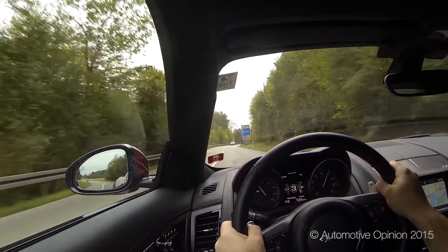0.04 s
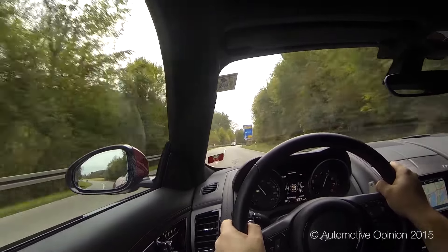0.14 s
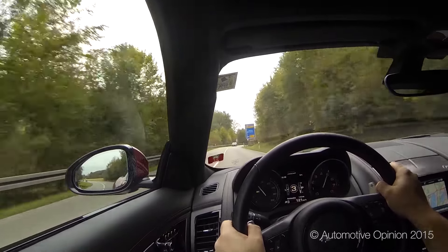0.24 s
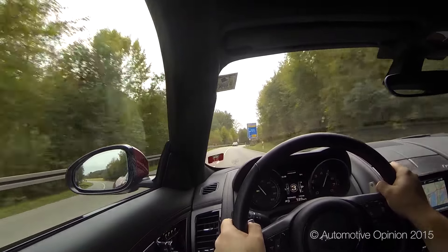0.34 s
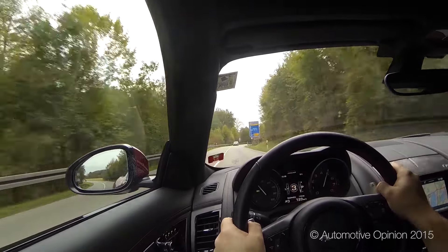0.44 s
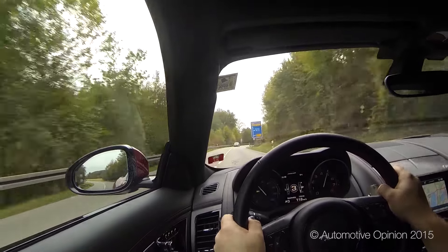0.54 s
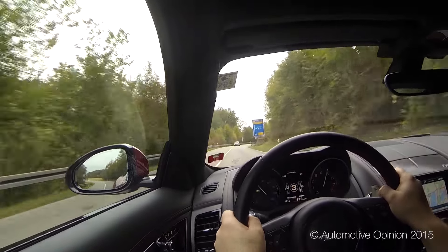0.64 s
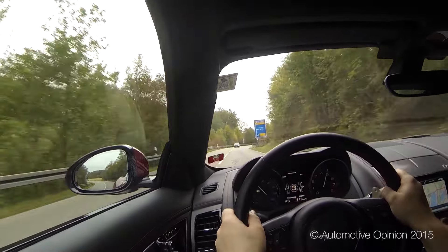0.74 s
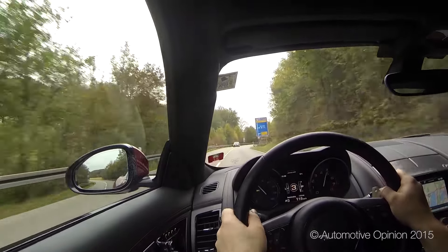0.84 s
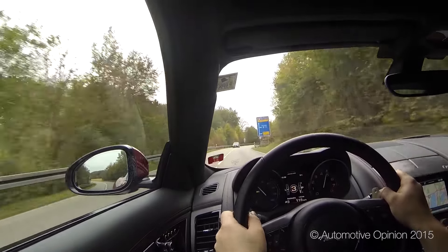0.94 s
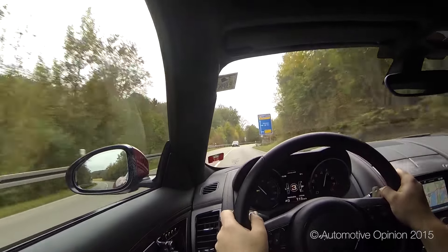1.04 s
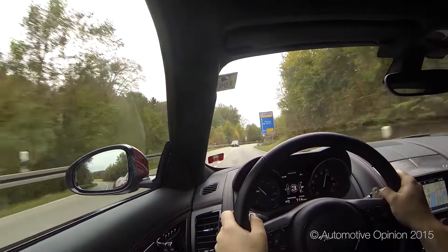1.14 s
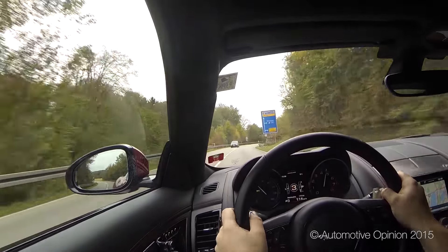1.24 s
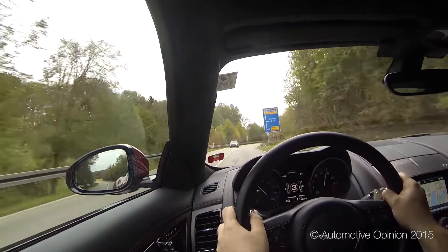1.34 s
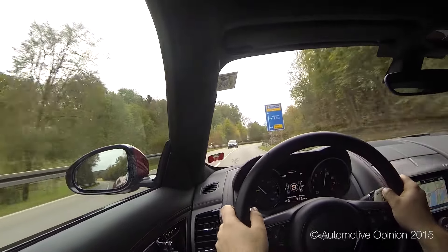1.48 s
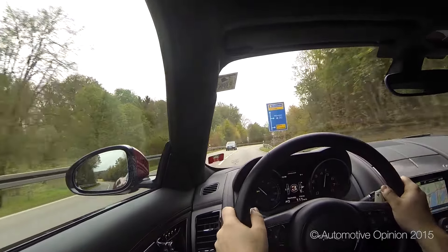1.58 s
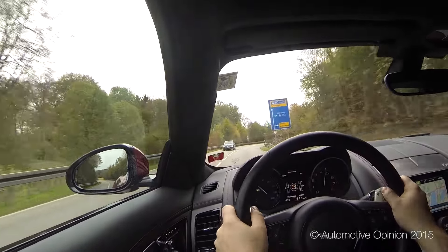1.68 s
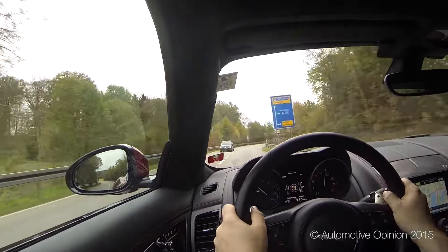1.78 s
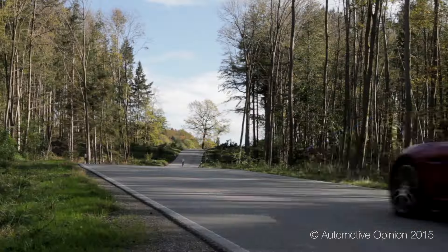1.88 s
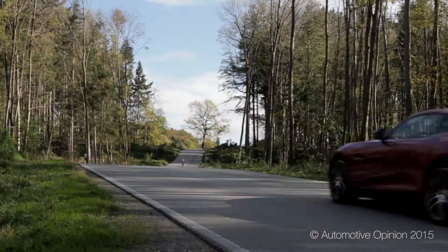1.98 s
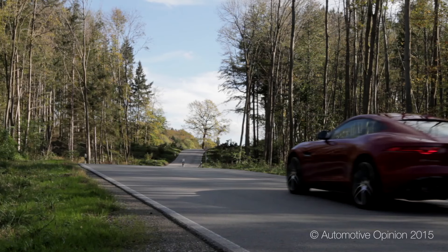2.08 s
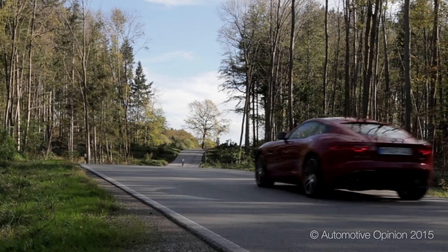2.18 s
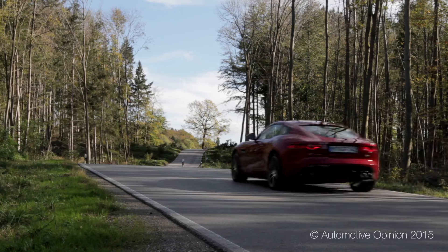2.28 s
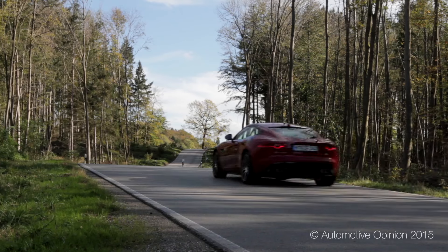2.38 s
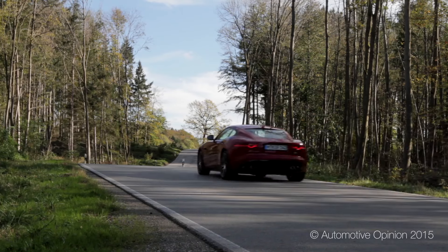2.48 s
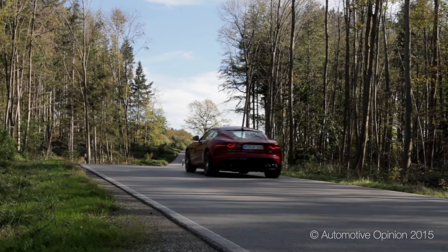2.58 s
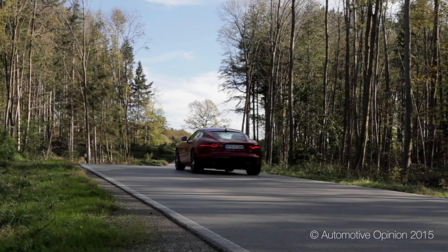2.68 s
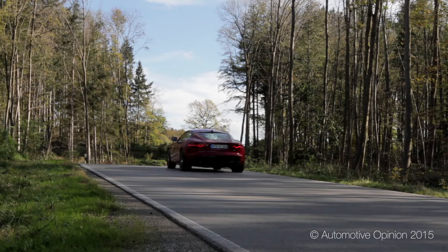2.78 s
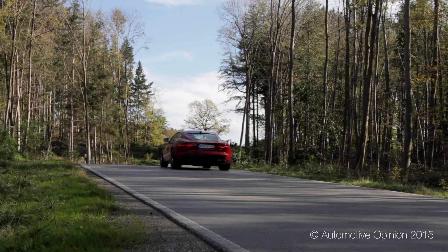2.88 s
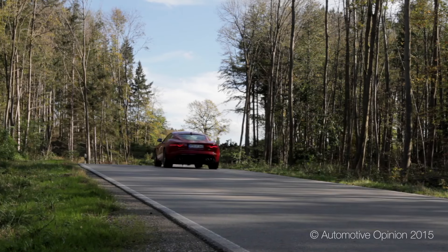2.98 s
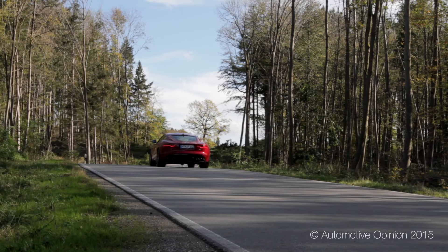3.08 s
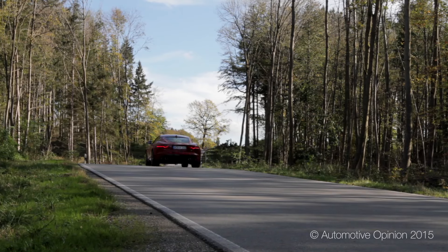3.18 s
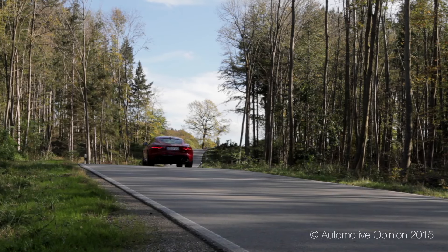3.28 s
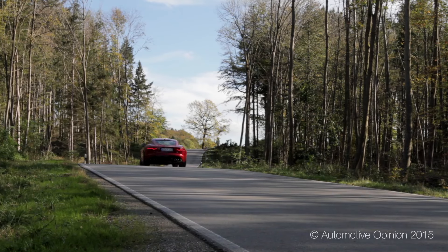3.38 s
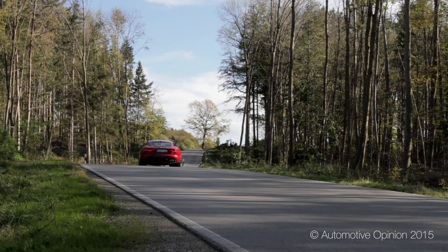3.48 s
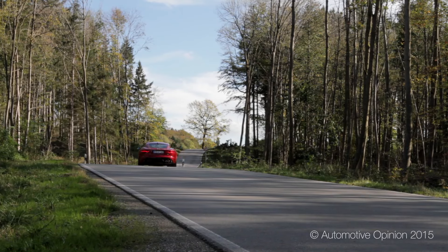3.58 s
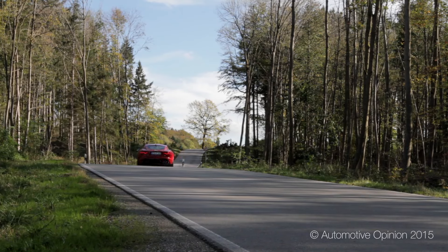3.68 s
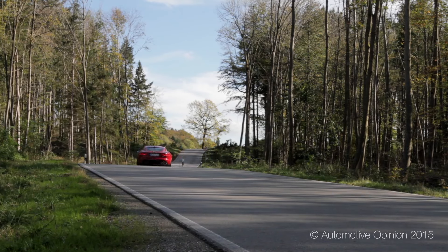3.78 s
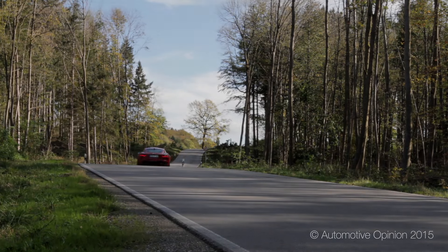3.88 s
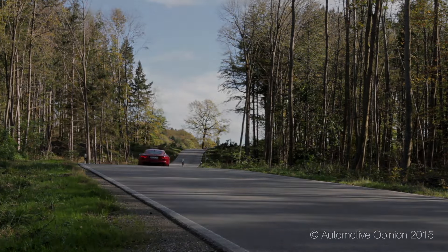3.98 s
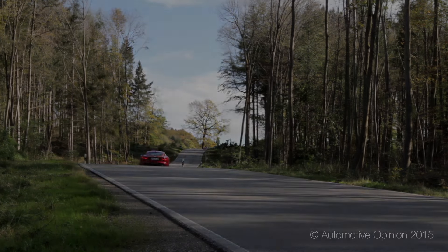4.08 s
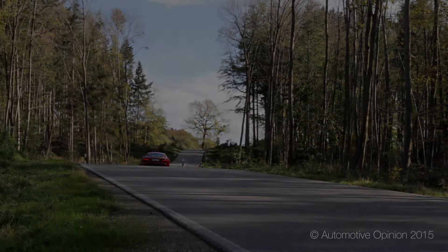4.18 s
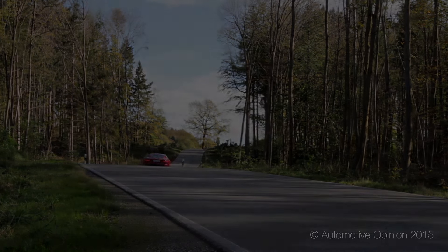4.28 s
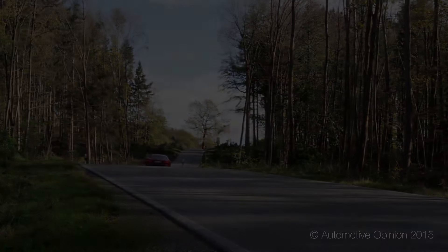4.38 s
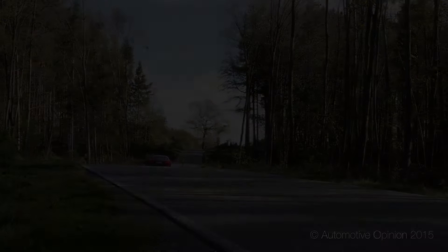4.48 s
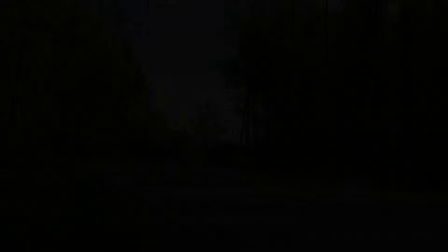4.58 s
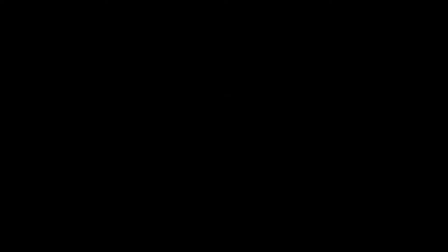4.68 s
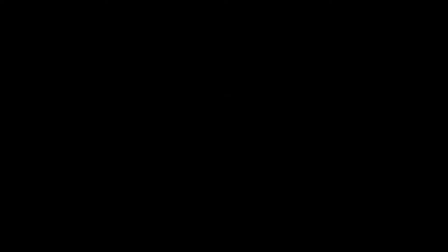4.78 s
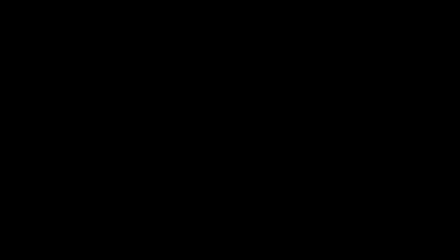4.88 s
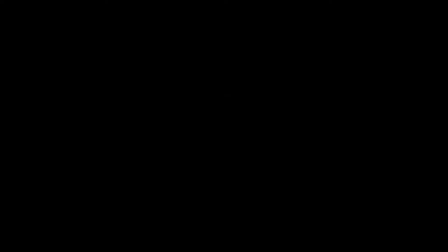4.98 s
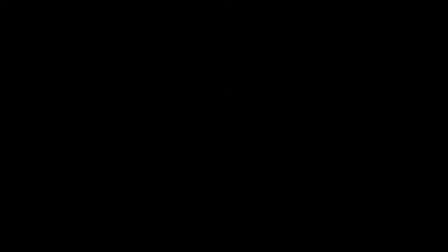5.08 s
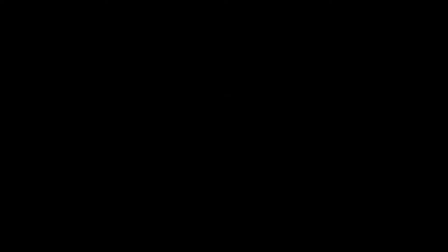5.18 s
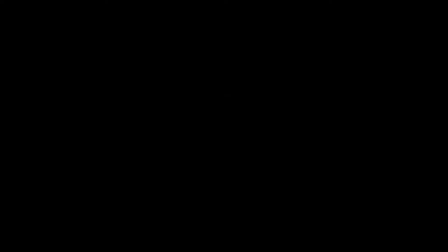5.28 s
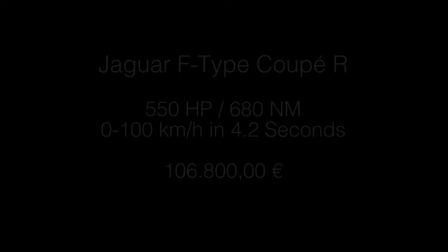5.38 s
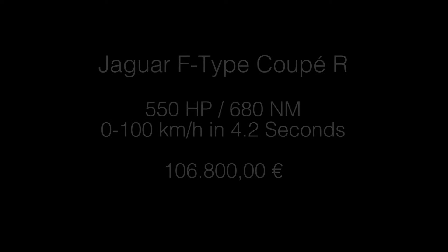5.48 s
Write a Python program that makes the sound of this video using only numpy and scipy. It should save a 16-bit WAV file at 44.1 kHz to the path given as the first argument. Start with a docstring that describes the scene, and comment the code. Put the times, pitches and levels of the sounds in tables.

```python
"""Wind buffets and the road rumbles over a droning cabin: a supercharged V8 sports car is coasting.
Unburnt fuel burbles in the exhaust, muffled at first, then cracks in the open air and rings the pipes.
The engine picks up and pulls with a hard, spitting rasp, each firing a pressure pulse and a jet of gas.
It changes up one gear with a blurt and eases off into the distance until mostly the tyres are left."""
import sys
import numpy as np
from scipy import signal
from scipy.fft import rfft, irfft
from scipy.io import wavfile
from scipy.ndimage import uniform_filter1d

SR = 44100
rng = np.random.default_rng(int(sys.argv[2]) if len(sys.argv) > 2 else 0)


def store_pcm(level_fs):
    """Save levels as 16-bit WAV."""
    pcm = np.round(np.clip(level_fs, -1, 1) * 32767).astype(np.int16)
    wavfile.write(sys.argv[1], SR, np.atleast_2d(pcm).T)


N = 244314
T = np.arange(N) / SR

# Levels in the tables are relative; each layer adds its own trim.
# wind and road bed: time_s, wind_db, road_db
RUMBLE_LEVELS = [(0.0, -21.5, -17.5), (0.39, -12, -16.5), (1.68, -13, -18.5), (1.88, -10.5, -19),
                 (2.02, -15.5, -19), (2.4, -15.5, -13.5), (2.52, -51, -28.5), (2.98, -63, -38),
                 (3.02, -68, -39)]
# sub-bass wind buffeting: freq_hz, gain_db
WIND_EQ = [(12, -10), (24, 11), (38, 19), (50, 12.5), (70, 4), (120, -4), (300, -73), (5000, -130)]
# low road drone: freq_hz, gain_db
ROAD_EQ = [(40, -26), (70, -4.5), (105, -1), (135, -9.5), (180, -6), (220, -8.5), (260, -15.5),
           (400, -18.5), (900, -27.5), (2500, -80.5), (10000, -105)]
# rolling tyres: freq_hz, gain_db
TYRE_EQ = [(30, -6), (110, -5), (260, -11.5), (380, 3), (520, -16), (900, 9.5), (1300, 7.5), (2000, -4.5),
           (3200, -8.5), (4300, -23.5), (7000, -55.5), (11000, -43.5), (16000, -65)]
# tyre hiss close by: freq_hz, gain_db
HISS_EQ = [(500, -6.5), (1500, 2), (3500, 8), (6000, -16), (10000, -12), (16000, -42)]
# cabin drone: time_s, note_db, hollow_boom_db
DRONE_LEVELS = [(0.0, -29, -38), (0.13, -29, -35), (0.23, -39, -16.5), (0.3, -28, -26), (0.39, -18, -19),
                (0.47, -23, -23.5), (0.56, -42, -59), (0.9, -83.5, -29.5), (1.6, -83.5, -27.5),
                (1.8, -84, -24), (1.95, -77, -15), (2.1, -93, -80)]
# 10th to 12th harmonics of the engine cycle: level_db
DRONE_OVERTONES = [-30.5, -36, -31]
# midrange growl in the cabin: freq_hz, gain_db
GROWL_EQ = [(500, -23), (1000, -2), (1400, -3.5), (1850, 0), (2400, -14.5), (3200, -16), (4500, -37),
            (9000, -62)]
# hollow cabin boom: freq_hz, gain_db
HOLLOW_EQ = [(150, -52.5), (200, -7), (222, -1), (245, -16.5), (330, -41.5), (1000, -100)]
# the exhaust's path into the cabin: freq_hz, gain_db
CABIN_EQ = [(230, 1), (300, -1.5), (360, -4.5), (415, 8), (480, 4), (530, -8.5), (620, -4), (830, 4),
            (1000, -5), (1150, -17.5), (2100, -0.5), (2650, -12.5), (3300, -15), (4050, -11), (4800, -20),
            (6000, -23.5), (9000, -9.5), (13000, -23.5)]
# what distance takes away: freq_hz, gain_db
DISTANCE_EQ = [(100, -3), (400, -0.5), (1200, -0.5), (3300, -5), (5000, -14.5), (9000, -7)]

# loud muffled afterfires: start_s, rasp_db, thump_db
BURBLE_HITS = [(0.416, -27, -13), (0.512, -44, -13), (0.62, -33.5, -15), (0.658, -27, -18),
               (0.746, -25, -16.5), (0.801, -21.5, -10), (0.862, -26, -11), (0.892, -36, -12.5),
               (0.92, -27.5, -12), (0.979, -38, -15), (1.007, -32, -13.5), (1.109, -23, -9),
               (1.192, -30.5, -25), (1.322, -28, -17.5), (1.43, -25.5, -11), (1.522, -23, -11.5),
               (1.57, -33, -19.5), (1.619, -21, -9), (1.726, -27.5, -14.5), (1.861, -31, -15)]
# loud open-air afterfires: start_s, bark_db, crack_db, tailpipe_db, silencer_db
BANG_HITS = [(1.927, -18, -44, -17, -1.5), (1.945, -14, -15.5, -6, -1), (2.023, -9.5, -15.5, -23, -4),
             (2.045, -14.5, -53, -35, -5), (2.057, -2, -5, -11, -7.5), (2.064, -13.5, -13, -31, -23),
             (2.102, -17, -54, -14, -12), (2.125, -15.5, -24.5, -7, -6), (2.173, -19, -45, -17, -7),
             (2.18, -6, -14.5, 0, -23), (2.233, -19, -53.5, -10.5, -5), (2.265, -15, -23, -9.5, -35),
             (2.315, -3, -4, 0, -24), (2.353, -16, -28, -8, -10), (2.422, -14.5, -23, -5, -9),
             (2.438, -6.5, -8, -2.5, -9), (2.462, -12.5, -7, -11.5, -42), (2.525, -10.5, -9.5, -7.5, -18),
             (2.554, -20, -27, -10, -20), (2.567, -17, -36, -21, -18), (2.581, -13.5, -29, -11, -11),
             (2.632, -14.5, -52, -22, -29), (2.665, -18.5, -48, -13, -15), (2.675, -10.5, -20.5, -8, -12),
             (2.701, -15.5, -27, -16, -25), (2.774, -9.5, -12, -18, -13), (2.798, -31, -62, -26, -12),
             (2.81, -20.5, -55, -37, -22.5), (2.864, -17, -62, -25, -13), (2.932, -31, -72, -25, -14.5),
             (2.939, -20.5, -76, -39, -19)]
# low ring of the silencers: pitch_hz, t60_s, level_db
SILENCER_RING = [(148, 0.09, -12.5), (227, 0.13, -8), (285, 0.05, -3), (364.7, 0.096, 12.5),
                 (392, 0.14, 3.5), (450, 0.049, -6.5)]
# hollow ring of the tailpipes: pitch_hz, t60_s, level_db
TAILPIPE_RING = [(676, 0.047, 1.5), (723, 0.034, -5.5), (830.5, 0.16, -19.5), (1153, 0.15, -21)]
# bark of exploding gas: freq_hz, gain_db
BARK_EQ = [(400, 6.5), (750, 10.5), (1300, 7), (1750, 8), (2300, 2.5), (3100, 2), (4200, -9.5), (6000, -18),
           (10000, -54), (16000, -62)]
# bright crack of a shock: freq_hz, gain_db
CRACK_EQ = [(1000, -1), (2500, 5.5), (3300, 17), (5000, 11.5), (7000, 7), (10000, 0.5), (12500, -9),
            (15500, -6.5), (17500, -46)]
# high zing of the pipe: freq_hz, gain_db
ZING_EQ = [(1500, -36), (2700, -20), (3200, 5.5), (3700, -4), (4150, -17), (5000, -22), (9000, -48)]
# fuel catching in the tailpipes under load: start_s, level_db
SPIT_HITS = [(3.154, -41), (3.226, -21), (3.258, -15), (3.285, -12), (3.312, -18), (3.597, -23),
             (3.734, -14), (3.761, -17.5), (3.895, -22), (3.998, -19), (4.05, -24), (4.152, -22),
             (4.253, -26), (4.678, -30), (4.748, -31), (4.782, -27), (4.851, -23.5), (4.885, -28),
             (5.2, -34)]
# snap of one spit: freq_hz, gain_db
SPIT_EQ = [(200, -17), (600, 6), (1100, -4), (2500, -0.5), (3300, 2), (4300, -17), (5500, -16.5),
           (7400, -23.5), (11000, -43), (15000, -60)]

# four-stroke cycle rate from the pick-up on: time_s, cycle_hz
PULL_SPEED = [(3.04, 30.72), (3.19, 33.56), (3.29, 35), (3.38, 34.55), (3.87, 37.8), (4.0, 39),
              (4.16, 39.05), (4.33, 40.4), (4.46, 36.55), (4.6, 30.75), (4.7, 28.4), (4.86, 29.76),
              (5.1, 28.2)]
# engine effort from the pick-up on: time_s, note_db
PULL_LOAD = [(3.02, -35.5), (3.05, -36.5), (3.14, -20.5), (3.31, -13), (3.4, -18.5), (3.85, -19),
             (4.3, -22), (4.5, -19.5), (4.58, -22.5), (4.91, -23.5), (5.11, -37), (5.13, -38),
             (5.22, -32.5), (5.27, -40), (5.47, -40.5), (5.48, -38), (5.54, -41)]
# ignition cuts, a stumble then the upshift: start_s, end_s, shift_share, added_roughness
IGNITION_CUTS = [(3.274, 3.383, 0, 0.46), (4.357, 4.54, 0.95, 0.47)]
# cylinders in firing order: pull_db, shift_db, light_load_db, manifold_travel_s
FIRING_ORDER = [(0, -0.5, -5.5, 0.00064), (3.5, 0, -14, 0.00094), (-10.5, -17, -1, 0.00034),
                (-13.5, -14.5, -7.5, .00062), (-5, -8, -12.5, .00018), (3, -2, -18.5, .0011),
                (2, -2.5, 2.5, .00054), (-13, -5, -13, 0.00002)]
# body of the exhaust note: freq_hz, gain_db
EXHAUST_EQ = [(35, -35.5), (75, -19), (150, -6), (230, -8.5), (295, -4.5), (335, -0.5), (375, 4), (425, -4),
              (470, -.5), (590, -8), (635, -8), (690, -9), (760, -8.5), (860, -11), (1000, -22),
              (1800, -23), (2400, -27.5), (3100, -31), (5000, -54.5), (12000, -83)]
# rasp of the gas jets: freq_hz, gain_db
RASP_EQ = [(40, -30.5), (300, -34), (800, 3), (1100, -1), (1330, 4), (1560, 3.5), (1720, 6.5), (1870, 7),
           (2080, -1), (2400, -2.5), (2750, -1), (3150, 0), (3900, -12.5), (5300, -15), (7400, -30),
           (13000, -46), (17000, -75.5)]
# bassy chuff of ragged burning: freq_hz, gain_db
CHUFF_EQ = [(25, -15), (60, 4.5), (130, -8.5), (250, -12), (420, -8.5), (650, -3), (850, 3.5),
            (1500, -19.5), (5000, -53.5), (12000, -100)]

OVERRUN_S, PULL_S, EASE_S, LIFT_S = 0.41, 2.92, 4.48, 5.1  # burbles begin; throttle opens, eases, shuts
COAST_END_S, PEDAL_S = 2.9, 0.075  # end of the run-down; travel time of the pedal
OUTSIDE_S, PASS_S = 1.924, 2.16  # the sound moves outside; the car passes


def undb(db):
    """Decibels to gain."""
    return 10 ** (np.asarray(db) / 20)


def curves(rows, at=T):
    """One envelope for each value column of a time table."""
    times, *columns = np.transpose(rows)
    return [np.interp(at, times, column) for column in columns]


def ramp(centre_s, length_s, at=T):
    """A linear fade from 0 to 1."""
    return np.clip((at - centre_s) / length_s + .5, 0, 1)


def wander(per_s):
    """Random modulation: values of spread 1 joined by straight lines."""
    return np.interp(T * per_s, np.arange(256), rng.standard_normal(256))


def unit(x):
    """Scale to rms 1."""
    return x / np.sqrt(np.mean(x ** 2))


def steady(x, size=4000):
    """Ride the running rms to 1, leaving single pulses their shape."""
    power = uniform_filter1d(uniform_filter1d(x ** 2, size), size // 2)
    return x / np.sqrt(power + 1e-12)


def peaked(x, size=180):
    """Scale a burst so that its loudest few milliseconds have rms 1."""
    return x / np.sqrt(uniform_filter1d(x ** 2, size).max())


def colour(x, eq, size=8192):
    """Minimum-phase EQ through (freq_hz, gain_db) points, built from the cepstrum."""
    hz, db = np.transpose(eq)
    bins_hz = np.maximum(np.fft.rfftfreq(size, 1 / SR), 1)
    gain = undb(np.interp(np.log(bins_hz), np.log(hz), db))
    cepstrum = irfft(np.log(gain))
    cepstrum[1:size // 2] *= 2
    cepstrum[size // 2 + 1:] = 0
    return signal.fftconvolve(x, irfft(np.exp(rfft(cepstrum))))[:len(x)]


def noise(eq):
    """Coloured noise, rms 1."""
    return unit(colour(rng.standard_normal(N), eq))


def add(out, start_s, x):
    """Drop a one-shot into the mix."""
    i = int(start_s * SR)
    out[i:i + len(x)] += x[:N - i]


def wind_and_road(road_db=-1, tyre_db=-38, fade_db_per_s=40, gust_db=2.5):
    """Wind buffets in gusts and the road drones at first; the tyres roll on throughout."""
    wind, road = curves(RUMBLE_LEVELS)
    fade = undb(-fade_db_per_s * np.maximum(T - RUMBLE_LEVELS[-1][0], 0))
    buffeting = steady(noise(WIND_EQ), size=6000) * undb(wind - gust_db * wander(per_s=9))
    drone = steady(noise(ROAD_EQ)) * undb(road + road_db)
    return (buffeting + drone) * fade + undb(tyre_db) * noise(TYRE_EQ)


def passing_hiss(peak_db=-44, recede_db_per_s=13.5):
    """The tyres hiss close by as the car passes, and fade as it recedes."""
    return (T > OUTSIDE_S) * undb(peak_db - recede_db_per_s * np.abs(T - PASS_S)) * noise(HISS_EQ)


def reflections(x, t60_s, size):
    """A dense echo tail from a unit-energy burst of decaying noise."""
    tail = rng.standard_normal(size) * undb(-60 * T[:size] / t60_s)
    return signal.fftconvolve(x, tail / np.linalg.norm(tail))[:len(x)]


def forest_echo(x, t60_s=0.076, wet_db=-17):
    """Out in the open, roadside trunks throw back a short echo."""
    echo = reflections(x * (T > OUTSIDE_S), t60_s, size=32768)
    return undb(wet_db) * colour(echo, [(100, -4), (400, -0.5), (3000, 10.5), (8000, 3), (15000, 10)])


def scatter(x, t60_s, wet_db):
    """Add early reflections off bodywork and road, which shift as the car moves."""
    weights = np.array([wander(per_s=5) for _ in range(4)])
    echoes = np.array([reflections(x, t60_s, size=8192) for _ in weights])
    return x + undb(wet_db) * (weights * echoes).sum(axis=0) / np.linalg.norm(weights, axis=0)


def through_cabin(x, crossfade_s=0.01):
    """The cabin muffles the treble until the sound moves outside."""
    inside = np.clip((OUTSIDE_S - T) / crossfade_s, 0, 1)
    return inside * colour(x, CABIN_EQ) + (1 - inside) * x


def far_off(x):
    """Far up the road, the exhaust loses its edge."""
    far = ramp(centre_s=5.05, length_s=0.34)
    return (1 - far) * x + far * colour(x, DISTANCE_EQ)


def cabin_drone(growl_db=-35, growl_depth=0.26):
    """The engine hums and booms in the cabin; its overtones and growl stop as the burbles begin."""
    note_db, boom_db = curves(DRONE_LEVELS)
    phase = 2 * np.pi * np.cumsum(cycle_hz()) / SR
    hum = unit(np.sin(4 * phase))  # half the firing rate
    overtones = sum(undb(db + 2 * wander(per_s=13)) * unit(np.sin(k * phase))
                    for k, db in enumerate(DRONE_OVERTONES, 10))
    growl = undb(growl_db) * unit((1 + growl_depth * np.cos(4 * phase)) * noise(GROWL_EQ))
    upper = (overtones + growl) * (1 - ramp(OVERRUN_S, PEDAL_S))
    return undb(note_db) * hum + upper + undb(boom_db) * steady(noise(HOLLOW_EQ))


def burst(hold_s, fall_s, tail_db, tail_s, size=8192):
    """Burning gas: noise that holds briefly, collapses and leaves a weak tail."""
    t = T[:size]
    envelope = np.exp(-np.maximum(t - hold_s, 0) / fall_s) + undb(tail_db) * np.exp(-t / tail_s)
    return envelope * rng.standard_normal(size)


def blast(wake_s, turbulence, size=8192):
    """A pressure jump with a turbulent wake."""
    push = turbulence * np.exp(-T[:size] / wake_s) * rng.standard_normal(size)
    push[0] += 1
    return push


def ring(push, modes, pitch_ratio=1, detune=0.02):
    """A push rings the pipe modes; gas heat detunes them a little each time."""
    t = T[:len(push)]
    hz, t60_s, db = np.array(modes).T[:, :, None]
    hz = pitch_ratio * hz * (1 + detune * rng.standard_normal(hz.shape))
    response = (undb(db - 60 * t / t60_s) * np.sin(2 * np.pi * hz * t)).sum(axis=0)
    return signal.fftconvolve(push, response)[:len(push)]


def soft_afterfires(start_s, end_s, mean_db, spread_db=2.5, per_s=19, count=40):
    """Small pops at uneven gaps, as rows of start_s, level_db."""
    timing, strength = rng.standard_normal((count, 2)).T
    times = start_s + (np.arange(count) + .5 + .3 * timing) / per_s
    return [(s, db) for s, db in zip(times, mean_db + spread_db * strength) if s < end_s]


def far_afterfires():
    """With the throttle shut again, soft afterfires far up the road keep both silencers ringing."""
    out = np.zeros(N)
    for _ in range(2):
        for s, db in soft_afterfires(LIFT_S - PEDAL_S, T[-1], mean_db=-38, spread_db=2.1):
            add(out, s, undb(db) * peaked(ring(blast(wake_s=0.15, turbulence=0.12), SILENCER_RING)))
    return out


def burbles(rasp_trim_db=-2, soft_thump_db=-21):
    """Afterfires deep in the exhaust, each a thump and a rasp, heard through the cabin."""
    out = np.zeros(N)
    soft = [(s, db, soft_thump_db) for s, db in soft_afterfires(OVERRUN_S, BURBLE_HITS[-1][0], -35)]
    for s, rasp_db, thump_db in BURBLE_HITS + soft:
        thump = colour(blast(wake_s=0.025, turbulence=0.063), EXHAUST_EQ)
        gas = colour(burst(hold_s=0.011, fall_s=0.017, tail_db=-19.5, tail_s=0.034), RASP_EQ)
        add(out, s, undb(thump_db) * peaked(colour(thump, CABIN_EQ)))
        add(out, s, undb(rasp_db + rasp_trim_db) * peaked(colour(gas, CABIN_EQ)))
    return out


def bangs(ring_trim_db=-1, gas_trim_db=1, zing_db=-10, zing_growth=0.31, doppler=0.063):
    """Fuel explodes near the tailpipes: the exhaust rings, the gas barks, the hardest hits crack."""
    out = np.zeros(N)
    soft = [(s, db, -58, -27, -19) for s, db in soft_afterfires(OUTSIDE_S, COAST_END_S, -32)]
    for s, bark_db, crack_db, tailpipe_db, silencer_db in BANG_HITS + soft:
        # until the car has passed, the silencer rings sharp and the pipe zings
        approaching = 1 - ramp(PASS_S, length_s=0.042, at=s)
        push = blast(wake_s=0.015, turbulence=0.04)
        bark = colour(burst(hold_s=.002, fall_s=.003, tail_db=-11, tail_s=.012), BARK_EQ)
        shock = burst(hold_s=.001, fall_s=.0009, tail_db=-22, tail_s=.005)
        silencer = ring(push, SILENCER_RING, pitch_ratio=1 + doppler * approaching)
        zing = approaching * peaked(colour(shock, ZING_EQ))
        add(out, s, undb(silencer_db + ring_trim_db) * peaked(silencer))
        add(out, s, undb(tailpipe_db + ring_trim_db) * peaked(ring(push, TAILPIPE_RING)))
        add(out, s, undb(bark_db + gas_trim_db) * peaked(bark))
        add(out, s, undb(crack_db + gas_trim_db) * peaked(colour(shock, CRACK_EQ)))
        add(out, s, undb(zing_db + zing_growth * crack_db) * zing)
    return out


def spits():
    """Under load, stray fuel catches in the tailpipes: short, bright snaps on top of the rasp."""
    out = np.zeros(N)
    for s, db in SPIT_HITS:
        snap = colour(burst(hold_s=.0006, fall_s=.0006, tail_db=-13, tail_s=.004), SPIT_EQ)
        add(out, s, undb(db) * peaked(snap))
    return out


def cycle_hz(start_hz=40.84, sag_hz_per_s=2.45):
    """Four-stroke cycles per second: an even run-down, then the pull and the upshift."""
    coast = [(0, start_hz), (COAST_END_S, start_hz - sag_hz_per_s * COAST_END_S)]
    return curves(coast + list(PULL_SPEED))[0]


def throttle(at=T, load_rough=0.17, overrun_rough=0.2, ease_rough=0.14, cut_ramp_s=0.076):
    """Pedal and ignition cuts set the roughness and the shares of upshift and light load (0-1)."""
    overrun, pull, ease, lift = (ramp(s, PEDAL_S, at) for s in (OVERRUN_S, PULL_S, EASE_S, LIFT_S))
    rough = load_rough + overrun_rough * (overrun - pull + lift / 2) + ease_rough * ease
    shifting = 0
    for start_s, end_s, shift_share, added_rough in IGNITION_CUTS:
        cut = ramp(start_s, cut_ramp_s, at) - ramp(end_s, cut_ramp_s, at)
        rough += added_rough * cut
        shifting += shift_share * cut
    return rough, shifting, 1 - pull + ease


def effort(rasp_under_db=6, rasp_growth=1.03, rasp_lag_s=0.018, shift_blare_db=1.5, lift_rasp_db=8):
    """Faders in dB for exhaust note and gas rasp: both follow the load, the rasp a little late."""
    load, = curves(PULL_LOAD)
    lagged = np.minimum(load, curves(PULL_LOAD, T - rasp_lag_s)[0])
    load_rasp = load.max() - rasp_under_db + rasp_growth * (lagged - load.max())
    # while coasting, the levels step as the burbles begin and as the sound moves outside
    overrun, outside = ramp(OVERRUN_S, PEDAL_S), ramp(OUTSIDE_S, PEDAL_S)
    coast_note = -34 + 5.5 * overrun
    coast_rasp = -34.5 - overrun + 2.5 * outside
    driven = ramp((COAST_END_S + PULL_S) / 2, PEDAL_S)
    blare = shift_blare_db * throttle()[1]
    note_db = coast_note + driven * (load - coast_note) + blare / 2
    rasp_db = coast_rasp + driven * (load_rasp - coast_rasp) + blare
    return note_db, rasp_db + lift_rasp_db * ramp(LIFT_S, PEDAL_S)


def firing_note(coast_db=-26, pull_db=-17, pickup_db=-37, waver_db=7, bank_db=-14,
                boom_db=-26, boom_hz=299.5, boom_width_hz=7.1):
    """Eight firings merge in the collector into one tone, which wavers when the burning is uneven."""
    firing_hz = 8 * cycle_hz()
    fired = np.cumsum(firing_hz) / SR
    travel_s = np.array(FIRING_ORDER)[:, 3].mean()
    phase = 2 * np.pi * np.interp(T - travel_s, T, fired)
    tone = steady(colour(np.cos(phase), EXHAUST_EQ))
    note_db, _ = effort()
    rough, _, _ = throttle()
    outside, pull, ease, lift = (ramp(s, PEDAL_S) for s in (OUTSIDE_S, PULL_S, EASE_S, LIFT_S))
    direct = undb(note_db + coast_db + (pull_db - coast_db) * pull) * (1 - lift)
    # as the throttle opens, the low note leads
    pickup = undb(pickup_db) * np.exp(-((T - PULL_S) / PEDAL_S) ** 2)
    # the cabin booms as the note slides through its resonance
    boom = undb(boom_db) * np.exp(-((firing_hz - boom_hz) / boom_width_hz) ** 2) * (1 - outside)
    # under full load the two banks differ, adding a sub-octave
    sub_octave = unit(np.sin(phase / 2)) * undb(note_db + bank_db) * (pull - ease)
    cycles = np.arange(int(fired[-1] / 8) + 2)
    waver = np.interp(fired / 8, cycles, rng.standard_normal(len(cycles)))
    return (tone * (direct + pickup + boom) + sub_octave) * undb(waver_db * rough * waver)


def firings(spread_db=4, jitter_s=0.00038, jet_growth=0.67, jet_jitter_s=0.00015):
    """Eight uneven firings a cycle: one train of pressure pulses, one of gas jet strengths."""
    fired = 8 * np.cumsum(cycle_hz()) / SR
    number = np.arange(1, int(fired[-1]))
    times = np.interp(number, fired, T)
    strength, timing, _, jet_timing = rng.standard_normal((len(number), 4)).T
    rough, shifting, light = throttle(times)
    pull_db, shift_db, light_db, travel_s = np.array(FIRING_ORDER)[number % 8].T
    db = pull_db + shifting * (shift_db - pull_db) + light * (light_db - pull_db)
    db += spread_db * rough * strength
    # unequal pipe lengths bunch the pulses: the V8 burble
    arrival = np.clip((times + travel_s + jitter_s * rough * timing) * SR, 0, N - 2)
    i, fraction = arrival.astype(int), arrival % 1
    pulses = np.bincount(i, undb(db) * (1 - fraction), N) + np.bincount(i + 1, undb(db) * fraction, N)
    jet_arrival = np.clip(arrival + jet_jitter_s * SR * jet_timing, 0, N - 1).astype(int)
    return pulses, np.bincount(jet_arrival, undb(jet_growth * db), N)


def engine(rasp_trim_db=-1, sizzle_db=-17, chuff_db=-3, snap_db=-6, snap_growth=0.39,
           jet_decay_s=0.0028, jet_floor=0.26):
    """Firings ring the exhaust; each drives a short jet of hissing gas out of the tailpipes."""
    note_db, rasp_db = effort()
    below_peak_db = rasp_db - rasp_db.max()
    rough, _, _ = throttle()
    pulses, jets = firings()
    body = steady(scatter(colour(pulses, EXHAUST_EQ), t60_s=0.09, wet_db=-7))
    flow = signal.lfilter([1], [1, -np.exp(-1 / (jet_decay_s * SR))], jets) + jet_floor
    gas = steady(scatter(colour(flow * rng.standard_normal(N), RASP_EQ), t60_s=0.032, wet_db=-4))
    # on the throttle, the hardest pulses steepen into little shocks that snap at the pipe mouth
    snaps = steady(scatter(colour(jets ** 1.5, RASP_EQ), t60_s=0.02, wet_db=-3), size=16000)
    snaps *= undb(snap_db + snap_growth * below_peak_db)
    snaps *= ramp(PULL_S, PEDAL_S) - ramp(LIFT_S, PEDAL_S)
    # ragged burning under load sizzles in the treble and chuffs in the bass
    ragged = rough * undb(below_peak_db / 2)
    sizzle = ragged * undb(sizzle_db) * steady(flow * noise(CRACK_EQ))
    chuff = ragged * rough * undb(chuff_db) * steady(colour(flow * rng.standard_normal(N), CHUFF_EQ))
    rasp = (gas + sizzle + snaps) * undb(rasp_db + rasp_trim_db)
    return through_cabin((body + chuff) * undb(note_db) + rasp)


def scene():
    """Mono mix: engine, afterfires and their echo over cabin, wind and road."""
    car = far_off(engine() + firing_note() + burbles() + bangs() + spits() + far_afterfires())
    return (car + forest_echo(car) + cabin_drone() + wind_and_road() + passing_hiss())[None]


def record(dry, ceiling=0.72, top_hz=16800):
    """Soft-clip the loudest peaks and cut the very top."""
    rounded = dry / (1 + (dry / ceiling) ** 4) ** (1 / 4)
    return signal.sosfilt(signal.ellip(8, .2, 80, top_hz, fs=SR, output="sos"), rounded)


dry = scene()
out = record(dry)
store_pcm(out)
```